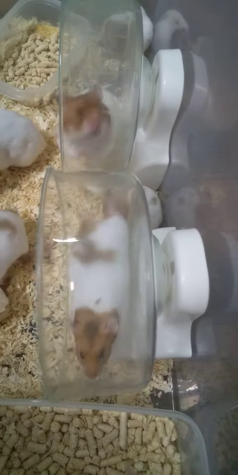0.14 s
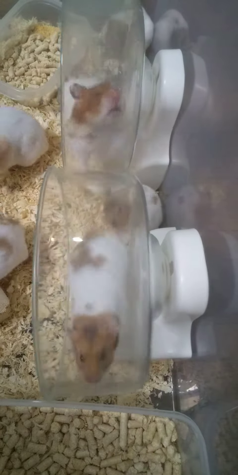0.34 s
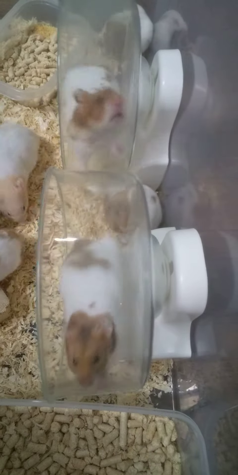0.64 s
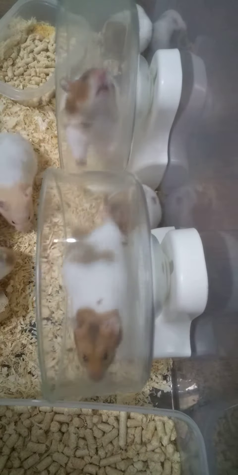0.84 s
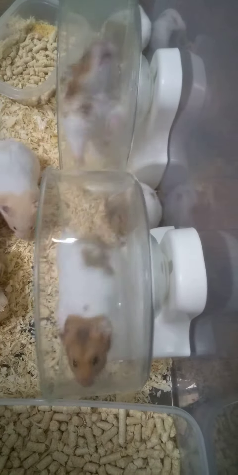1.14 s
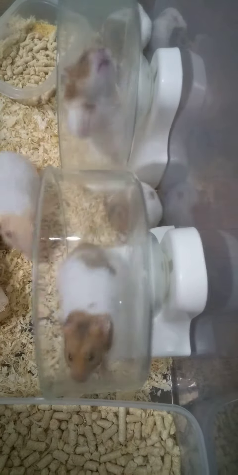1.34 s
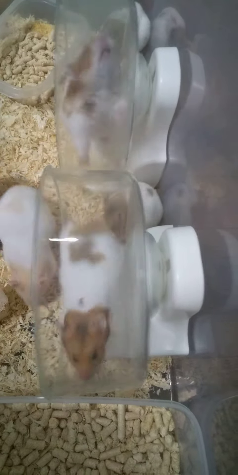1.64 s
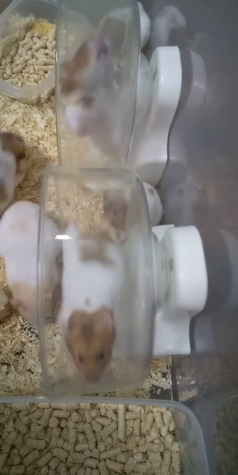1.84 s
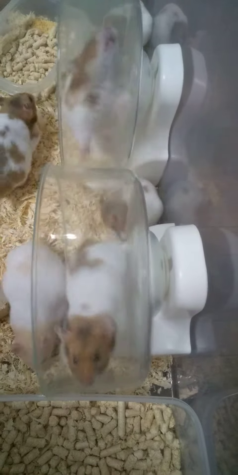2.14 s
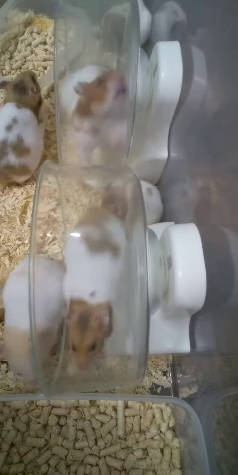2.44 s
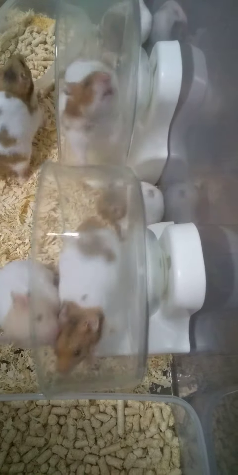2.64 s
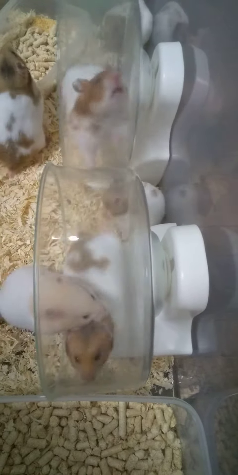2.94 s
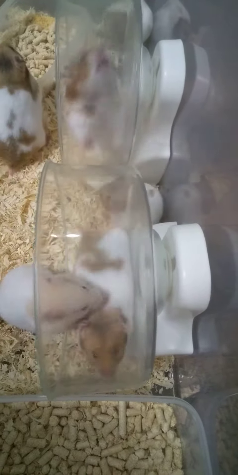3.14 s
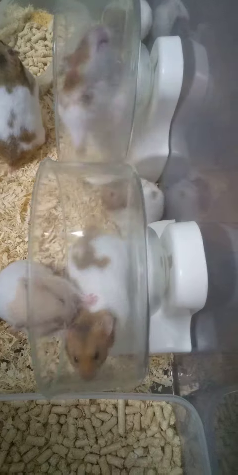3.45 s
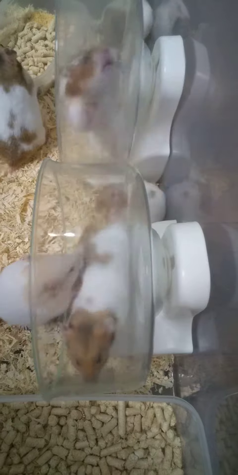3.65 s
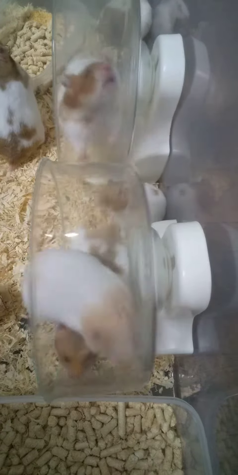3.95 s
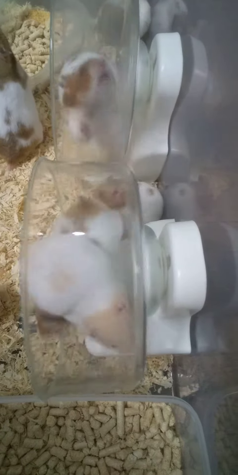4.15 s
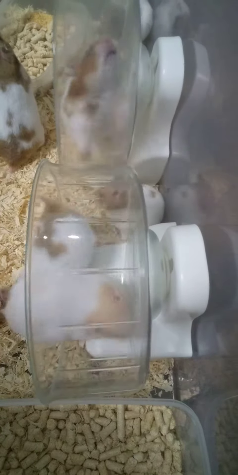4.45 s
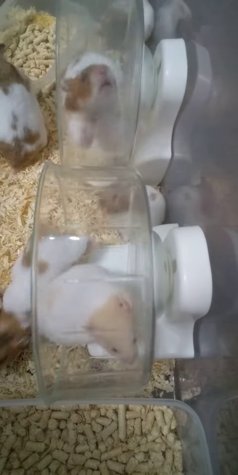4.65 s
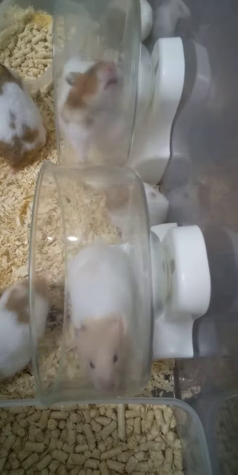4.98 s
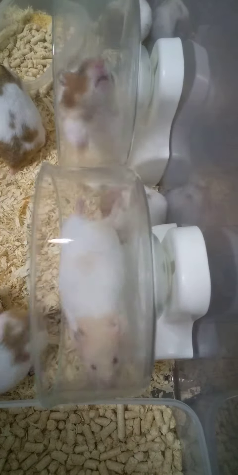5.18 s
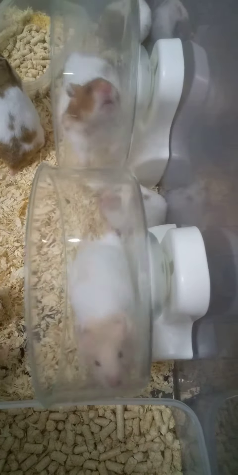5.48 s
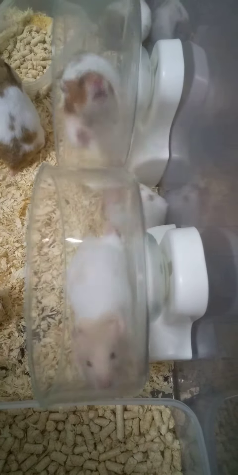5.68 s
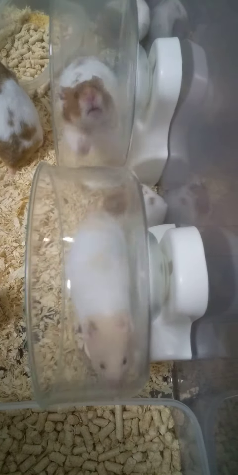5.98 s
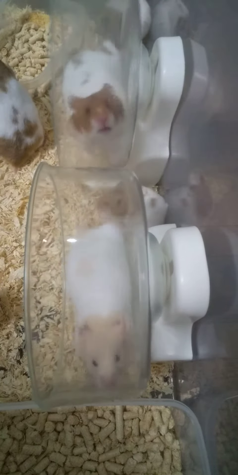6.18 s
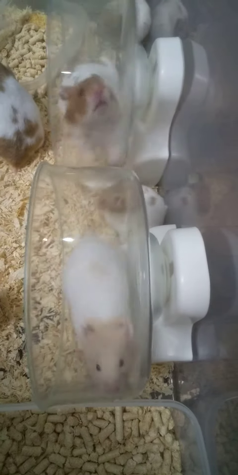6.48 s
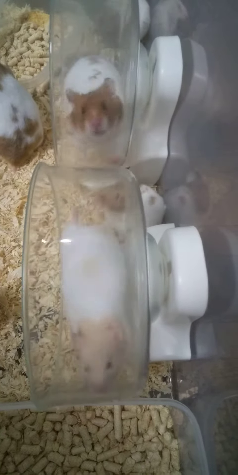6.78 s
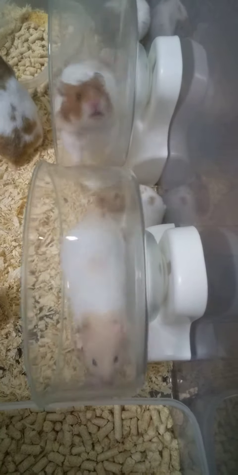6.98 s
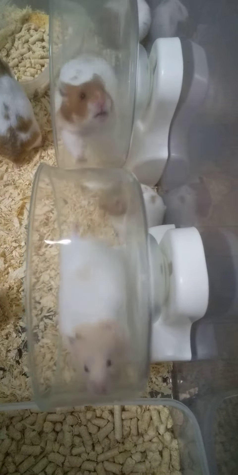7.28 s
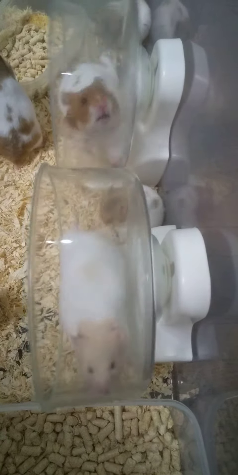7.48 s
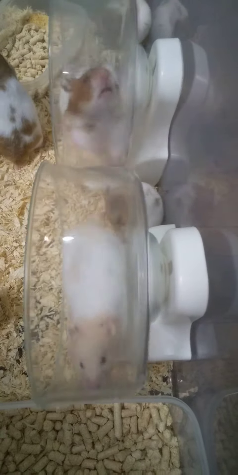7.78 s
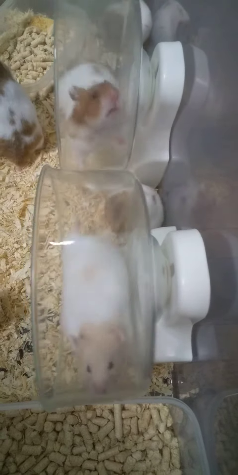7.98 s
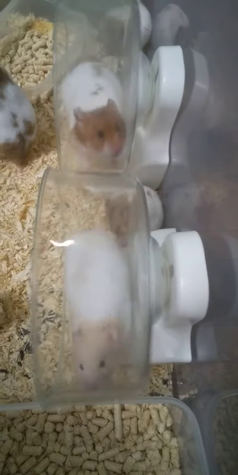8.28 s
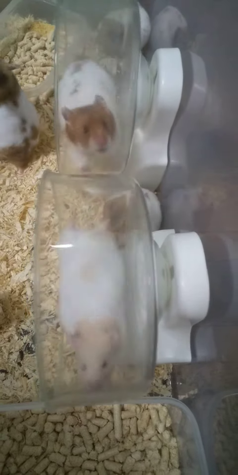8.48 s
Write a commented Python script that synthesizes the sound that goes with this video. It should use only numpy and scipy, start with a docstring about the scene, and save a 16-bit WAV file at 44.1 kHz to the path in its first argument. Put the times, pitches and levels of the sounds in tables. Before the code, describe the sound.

Small rodents run in plastic exercise wheels, their claws pattering over a low rumble while the loose stands knock irregularly.

```python
"""Small rodents run in plastic exercise wheels in a plastic tub, heard close and centred.
From the start the wheels rumble through the tub under a fine patter of claws and a faint hum.
The loose stands rock and knock on the tub floor throughout, while paws scuff and tick on the tracks.
From 3.5 s come a few hard taps on a rim, just after 4 s a cluster of dry snaps,
and around 7 s three short skids; the running carries on to the end."""
import sys
import numpy as np
from scipy import signal
from scipy.fft import rfft, irfft, next_fast_len
from scipy.io import wavfile

SR = 44100
rng = np.random.default_rng(int(sys.argv[2]) if len(sys.argv) > 2 else 0)


def persist_wave(psi):
    """Save psi, clipped to +-1, as 16-bit WAV."""
    counts = np.round(np.clip(psi, -1, 1) * 32767).astype(np.int16)
    wavfile.write(sys.argv[1], SR, np.atleast_2d(counts).T)


N = 380141

# fader moves of the running bed: (time [s], rumble [dB], drumming [dB], patter [dB])
BED_LEVELS = [(0.0, -40.5, -50, -57), (0.5, -43.5, -53, -58.5), (1.03, -40.5, -48.5, -56),
              (2.21, -37, -45.5, -56), (2.38, -43.5, -45, -55.5), (3.55, -41, -55.5, -59.5),
              (3.89, -41.5, -47, -56.5), (4.51, -41, -51, -54.5), (4.8, -51, -50.5, -59),
              (5.09, -39.5, -60, -58), (5.42, -38, -46, -54.5), (6.43, -39.5, -45.5, -53.5),
              (6.86, -41.5, -49, -54.5), (7.9, -40, -46, -56.5), (8.31, -38, -43, -54),
              (8.62, -42, -51, -55.5)]
# EQ of the wheel rumble: (frequency [Hz], level [dB])
RUMBLE_EQ = [(15, -34), (25, -2), (70, 0.5), (200, -15.5), (260, -25.5), (440, -120)]
# EQ of the drumming tub: (frequency [Hz], level [dB])
DRUMMING_EQ = [(71, 3), (120, 0.5), (374, -5), (450, -14), (547, -5.5), (630, -16), (791, -12), (1400, -26),
               (1600, -52), (2080, -52), (3520, -120)]
# EQ of bedding hiss and dry claw crackle: (frequency [Hz], level [dB])
PATTER_EQ = [(590, -46), (1000, 0), (1400, -3), (1990, -10), (2200, -7.5), (2490, -10.5), (3640, -10),
             (7500, -22), (8760, -19), (14300, -21)]
# spots of the track that claws ring: (frequency [Hz], level [dB], t60 [s])
TRACK_MODES = [(2236, -8, 0.054), (2830, -2, 0.029), (3206, -5, 0.025), (3690, -2.5, 0.038),
               (4250, -7.5, 0.048), (4730, -6.5, 0.029), (6610, -11, 0.032)]
# a stand hits the tub floor:
# (time [s], thud [dB], hollow ring over thud [dB], hard edge over thud [dB], roll from edge to flat [s])
STAND_KNOCKS = [(0.051, -38.5, -3, -14, 0.0036), (0.204, -48.5, 4, 0, 0.0016),
                (0.543, -27.5, -4.5, -29, 0.0021), (0.708, -20.5, -8.5, -32, 0.0037),
                (0.979, -14, -9, -21.5, .005), (1.17, -30.5, -26, -43, 0.0028),
                (1.25, -32, -14, -14.5, 0.00069), (1.363, -37.5, -12, -19, 0.0024),
                (1.433, -27.5, -6.5, -34, .004), (1.527, -20.5, -2.5, -25.5, 0.0035),
                (1.78, -17, -7, -21.5, 0.0019), (1.974, -30, -17, -26, 0.0018),
                (2.178, -32, -19, -19, .002), (2.248, -10, -3.5, -17, 0.0015),
                (2.493, -15, -5.5, -17.5, .005), (2.677, -24, -6, -27.5, 0.0039),
                (2.888, -37.5, -8, -14, 0.0012), (2.908, -26.5, -22, -20, 0.0022),
                (3.011, -15, 1, -16.5, 0.00098), (3.335, -19, -9, -27.5, 0.0019),
                (3.549, -28, -10.5, -30, 0.0025), (3.709, -38.5, -9, -16, 0.0015),
                (3.803, -10.5, -10.5, -29.5, 0.0019), (3.951, -34, -6, -13.5, .003),
                (4.058, -12, -6.5, -17.5, .005), (4.295, -31, -8.5, -23, 0.0011),
                (4.551, -11.5, -9.5, -14, .005), (4.753, -30.5, -13, -34, .001),
                (4.9, -26.5, -8, -36, .004), (5.036, -30.5, -2, -26, 0.0031),
                (5.177, -35.5, -3.5, -21, 0.00077), (5.29, -36, -10, -10, 0.00083),
                (5.313, -12.5, -11, -23, .005), (5.574, -10.5, 2.5, -11.5, 0.0021),
                (5.765, -25, -9, -32, 0.0019), (5.828, -33, -33, -15, .002),
                (5.977, -13.5, -6, -12, 0.00095), (6.13, -18, -9, -27, 0.0011),
                (6.261, -37.5, 2.5, -13, 0.0014), (6.419, -11, -2.5, -15.5, 0.0022),
                (6.55, -28.5, 3.5, -16.5, 0.0014), (6.6, -25.5, -18, -21, .004),
                (6.914, -36, -2, -27, 0.0017), (7.138, -24, -9, -43, 0.0016),
                (7.218, -27.5, -6.5, -42.5, 0.0025), (7.495, -28, -21, -28, 0.0016),
                (7.562, -12, -2, -16, 0.0021), (7.648, -30, -9, -23, 0.0014),
                (7.667, -24.5, -15.5, -34, 0.0022), (7.761, -29, -5.5, -38, 0.0025),
                (7.998, -12.5, -5, -16.5, 0.0059), (8.139, -17, 2, -13.5, .002),
                (8.469, -12, -3.5, -13.5, 0.0015)]
# modes of stand and tub: (frequency [Hz], level [dB], t60 [s])
STAND_MODES = [(91.2, -4, 0.11), (156, -19, 0.074), (179, -2.5, 0.068), (214.6, -4.5, 0.065),
               (265.5, 6.5, 0.034), (352, -11.5, 0.059), (497.8, -7, 0.14), (528.6, -21.5, 0.16),
               (666, -15, 0.084), (814.5, 5, 0.05), (810, -25.5, 0.46), (907, -11.5, 0.039),
               (933.7, -3.5, 0.047), (1107, -5, 0.012), (1247, -3, 0.048), (1296, 1.5, 0.1),
               (1418, 4.5, 0.026), (1765, -7, 0.055), (2276, 7.5, 0.014), (2321, -9.5, 0.13),
               (2470, -23, 0.047), (3190, -14, 0.026), (3154, 3, 0.025), (4000, -25, 0.036),
               (4100, -39, 0.044), (4286, -12, 0.02)]
# contacts within a knock, for each of its three layers: (delay [s], level [dB])
EDGE_CONTACTS = [(0, -5.5), (0.002, 3.5), (0.011, -9.5)]
THUD_CONTACTS = [(0.00324, -2), (0.014, -14)]
ROLL_S = np.array(STAND_KNOCKS)[:, 4]
HOLLOW_CONTACTS = [(-0.003, -20), (0, -10), (ROLL_S, 4), (ROLL_S + 0.00942, -6)]
# paws land on the track: (time [s], level [dB])
PAW_STEPS = [(0.0593, -47.5), (0.136, -47.5), (0.209, -54), (0.239, -47), (0.317, -45), (0.405, -44),
             (0.4845, -41), (0.5746, -44), (0.654, -47.5), (0.6744, -50), (0.7504, -41.5), (0.861, -45),
             (0.952, -45), (1.0316, -47.5), (1.1158, -47), (1.128, -46), (1.216, -44), (1.308, -45.5),
             (1.404, -45.5), (1.478, -48), (1.57, -49), (1.6724, -43), (1.7576, -45.5), (1.85, -48),
             (1.945, -48), (2.0403, -46), (2.132, -49), (2.2149, -47), (2.2812, -47), (2.3131, -48),
             (2.375, -48), (2.474, -42), (2.601, -49.5), (2.7038, -49), (2.759, -46), (2.8864, -49),
             (2.994, -51), (3.114, -46), (3.245, -47.5), (3.2915, -47), (3.324, -45), (3.489, -48.5),
             (3.591, -47), (3.928, -54), (4.339, -48), (4.4506, -41), (4.7423, -44.5), (5.4135, -43.5),
             (5.4804, -45), (5.5594, -53), (5.9239, -62), (5.954, -62), (6.0237, -46), (6.201, -46),
             (6.2662, -46), (6.3565, -45), (6.499, -47), (6.6084, -47), (6.7004, -42), (6.825, -46),
             (6.941, -49), (7.001, -41), (7.137, -43), (7.1733, -42.5), (7.2124, -48), (7.323, -46),
             (7.3754, -42), (7.453, -47), (7.642, -39.5), (7.7184, -46.5), (7.774, -48), (7.811, -43),
             (7.88, -40.5), (7.911, -46), (7.985, -36), (8.036, -39), (8.0571, -42), (8.07, -44),
             (8.236, -43.5), (8.2815, -50), (8.305, -49), (8.545, -36)]
# EQ of a paw's scuff: (frequency [Hz], level [dB])
SCUFF_EQ = [(900, -7), (1800, -2.5), (3000, -3.5), (4400, 2), (5400, -2), (7300, -10), (9000, -4.5),
            (11000, -13.5), (13300, -7), (14300, -10)]
# single claws that cut through: (time [s], level [dB], pitch [Hz])
CLAW_TICKS = [(0.325, -45, 2850), (0.5, -45, 2850), (0.6744, -54, 2850), (0.7497, -44, 2830),
              (1.128, -40, 3706), (1.23, -39, 2830), (1.414, -36.5, 2880), (1.587, -45, 2850),
              (1.735, -49, 4030), (1.948, -38.5, 2850), (2.0403, -43, 3500), (2.133, -42, 2850),
              (2.2149, -47, 3850), (2.688, -47, 2860), (2.704, -41, 5500), (4.4513, -42, 3500),
              (4.738, -46, 3170), (4.807, -49, 2820), (5.669, -47, 4830), (5.9239, -45.5, 3480),
              (6.201, -44, 3150), (6.2662, -45, 3700), (6.3565, -42, 4140), (6.6084, -43, 3650),
              (6.7014, -46, 3800), (6.941, -43, 3760), (7.017, -36.5, 2580), (7.117, -40, 3600),
              (7.2124, -39, 2790), (7.643, -37, 3580), (7.7426, -42.5, 2860), (7.8096, -42, 3540),
              (7.912, -42, 2880), (7.984, -43, 6600), (8.037, -36, 7060), (8.058, -39, 7000),
              (8.306, -38, 6960), (8.315, -33, 3500)]
# something hard taps a wheel rim: (time [s], level [dB], lows over level [dB], highs over level [dB])
RIM_TAPS = [(3.516, -52, 5, -22), (7.12, -39.5, 4, -13), (7.7191, -38, 2.5, -26),
            (7.8904, -26.5, -2.5, -35), (8.3197, -26, 3.5, -5.5), (8.4, -31, 6, -4)]
# modes of the rim: (frequency [Hz], level [dB], t60 [s])
RIM_MODES = [(252.5, 2, 0.029), (394, -40, .03), (517, 4.5, 0.019), (718, 3, 0.026), (1130, 10.5, 0.0057),
             (1334, 9, 0.015), (1580, -0.5, 0.0089), (2100, -20, 0.025), (2580, -22, 0.03),
             (2850, -25, 0.018), (3500, -45, 0.033), (3850, -1, 0.023), (4430, -28, .05),
             (6940, -51, 0.026), (9000, -57, 0.022)]
# contacts within a tap: (delay [s], level [dB])
TAP_CONTACTS = [(0, -5.5), (0.0021, 7.5), (0.005, -8), (0.009, -10)]
# snaps in the bedding or on the plastic: (time [s], level [dB], t60 [s])
DRY_SNAPS = [(4.2347, -41, 0.048), (4.297, -43, 0.012), (4.419, -12.5, 0.027), (4.456, -30, 0.024)]
# EQ of a snap: (frequency [Hz], level [dB])
SNAP_EQ = [(180, -21), (300, 1), (1540, -4.5), (1780, 0.5), (3180, -13), (3620, 2.5), (5090, -53),
           (9000, -56), (11700, -73), (19800, -120)]
# paws skid along the track: (time [s], length [s], level [dB])
PAW_SKIDS = [(6.986, 0.089, -49), (7.065, 0.1, -52), (7.247, .06, -53.5)]
# EQ of a skid: (frequency [Hz], level [dB])
SKID_EQ = [(590, -32), (1000, -1), (1950, -4.5), (2820, 1), (3080, -6), (3720, -5), (4490, -11.5),
           (14300, -19)]


def amp(db):
    """Gain of a level in dB."""
    return 10 ** (np.asarray(db) / 20)


def rms_one(x):
    """Normalise to rms 1."""
    return x / np.sqrt(np.mean(x ** 2) + 1e-20)


def noise():
    """White noise, the length of the scene."""
    return rng.standard_normal(N)


def band(x, side, hz, order=2):
    """High-pass or low-pass filter."""
    return signal.sosfilt(signal.butter(order, hz, side, fs=SR, output="sos"), x)


def coloured(x, eq):
    """Shape x with an EQ curve and normalise to rms 1."""
    size = next_fast_len(N)
    hz, level_db = np.transpose(eq)
    bins_hz = np.maximum(np.arange(size // 2 + 1) * SR / size, 1)
    gain = amp(np.interp(np.log(bins_hz), np.log(hz), level_db))
    return rms_one(irfft(rfft(x, size) * gain, size)[:N])


def drift(rate_hz):
    """Smooth random modulator of rms 1."""
    r = np.exp(-2 * np.pi * rate_hz / SR)
    return rms_one(signal.lfilter([1], [1, -2 * r, r * r], rng.standard_normal(N + SR))[SR:])


def ring(drive, hz, t60):
    """Resonator: a unit click starts a decaying sine of height 1."""
    r, w = amp(-60 / (t60 * SR)), 2 * np.pi * hz / SR
    return signal.lfilter([0, np.sin(w)], [1, -2 * r * np.cos(w), r * r], drive + 1e-18)


def tub_shake(level_db, eq, lumps_db, rate_hz):
    """Axles and paws shake the tub: a lumpy low end."""
    return amp(level_db + lumps_db * drift(rate_hz)) * coloured(noise(), eq)


def hum():
    """A faint, steady, breathy tone."""
    return amp(-62) * rms_one(ring(noise(), hz=557, t60=0.064))


def claw_hits(per_s, spread_db):
    """Random claw impulses, and the spot of the track each one lands on."""
    hits = rng.random(N) < per_s / SR
    strength = amp(spread_db * np.minimum(rng.exponential(1, N), 4))
    return hits * strength * rng.choice([-1, 1], N), rng.integers(0, len(TRACK_MODES), N)


def track_ring(hits, spots):
    """Each claw rings the spot of plastic it lands on."""
    return sum(amp(db) * ring(hits * (spots == k), hz, t60)
               for k, (hz, db, t60) in enumerate(TRACK_MODES))


def patter(level_db):
    """Clumps of tiny claw contacts, some ringing and some dry, over the hiss of shifting bedding."""
    grains = track_ring(*claw_hits(per_s=190 * amp(4.5 * drift(22)), spread_db=4.5))
    dry_hits, _ = claw_hits(per_s=110 * amp(4.1 * drift(8.3)), spread_db=7)
    crackle = signal.lfilter([1], [1, -0.97], np.abs(dry_hits)) * noise()   # millisecond puffs
    low, high = band(noise(), "low", 7000), band(noise(), "high", 7000)
    hiss = low * amp(2.3 * drift(36)) + high * amp(1.3 * drift(16))
    hiss *= amp(2.2 * drift(45))   # the bands flicker both apart and together
    rustle = coloured(hiss + amp(-12) * rms_one(crackle), PATTER_EQ)
    return amp(level_db) * (rustle + amp(-7) * rms_one(grains))


def struck(times, levels_db, modes, contacts, spread_db, contact_s, neighbour=-1):
    """Each blow rings the modes through a few soft contacts, a little different every time."""
    out = np.zeros(N)
    scatter_db = spread_db * rng.standard_normal((len(times), len(modes), len(contacts)))
    t = np.arange(int(contact_s * SR) + 3) / SR
    push = np.hanning(len(t))   # the force swells and fades during a contact
    for k, (hz, mode_db, t60) in enumerate(modes):
        clicks = np.zeros(N)
        for j, (delay, contact_db) in enumerate(contacts):
            at = np.minimum(((times + delay) * SR).astype(int), N - 1)
            np.add.at(clicks, at, amp(levels_db(hz) + mode_db + contact_db + scatter_db[:, k, j]))
        force = push / push.sum() * np.cos(2 * np.pi * hz * (t - t.mean()))
        # a negative neighbour swings adjacent modes against each other
        out += neighbour ** k * ring(np.convolve(clicks, force)[:N], hz, t60)
    return out


def stand_knocks(hollow_from_hz=650, edge_from_hz=1000):
    """The foot lands in stages: a graze, the edge, full weight as it rolls flat, a small rebound."""
    times, thud_db, hollow_db, edge_db, _ = np.transpose(STAND_KNOCKS)
    highs = [mode for mode in STAND_MODES if mode[0] >= edge_from_hz]
    mids = [mode for mode in STAND_MODES if hollow_from_hz <= mode[0] < edge_from_hz]
    lows = [mode for mode in STAND_MODES if mode[0] < hollow_from_hz]
    edge = struck(times, lambda hz: thud_db + edge_db, highs, EDGE_CONTACTS,
                  spread_db=5, contact_s=0.00173)
    hollow = struck(times, lambda hz: thud_db + hollow_db, mids, HOLLOW_CONTACTS,
                    spread_db=3, contact_s=0.0018)
    # the floor gives way as one, a moment later, and pushes the air up first
    thud = struck(times, lambda hz: thud_db, lows, THUD_CONTACTS,
                  spread_db=4, contact_s=0.0022, neighbour=0.99)
    return edge + hollow + band(thud, "high", 110)


def in_tub(x, wet_db=-18, t60=0.24, damping_hz=1630):
    """The tub walls add a dense, dull, hollow tail."""
    t = np.arange(SR // 2) / SR
    tail = rng.standard_normal(len(t)) * amp(-60 * t / t60) * np.minimum(t / 0.00217, 1)
    tail = signal.lfilter(*signal.butter(1, damping_hz, fs=SR), tail)
    return x + amp(wet_db) * signal.fftconvolve(x, tail / np.linalg.norm(tail))[:N]


def footfalls(scuff_t60=0.045, tick_t60_cycles=118, jolt_hz=3174):
    """Steps and jolts scuff up a gritty hiss and drag claws over the track; single claws tick out."""
    ticks, envelope, t = np.zeros(N + SR), np.zeros(N + SR), np.arange(SR // 8) / SR
    # every knock and tap jolts the grit on the track: a scuff and a click
    jolts = [(s, db + edge_db - 11) for s, db, _, edge_db, _ in STAND_KNOCKS]
    jolts += [(s, db + high_db + 5) for s, db, _, high_db in RIM_TAPS]
    for s, db in PAW_STEPS + jolts:
        envelope[round(s * SR):][:len(t)] += amp(db - 60 * t / scuff_t60) * np.minimum(t / 0.0028, 1)
    for s, db, hz in CLAW_TICKS + [(s, db - 6.5, jolt_hz) for s, db in jolts]:
        shape = amp(db - 60 * t * hz / tick_t60_cycles) * np.minimum(t / 0.0004, 1)
        ticks[round(s * SR):][:len(t)] += shape * np.sin(2 * np.pi * hz * t)
    envelope = envelope[:N]
    hiss = coloured(noise(), SCUFF_EQ)
    air = band(hiss, "high", 9000) * 0.6 * np.tanh(drift(9.4))   # some steps are brighter than others
    grit = (hiss + air) * amp(0.98 * drift(400))
    hits, spots = claw_hits(per_s=600, spread_db=2.5)
    return ticks[:N] + amp(-2) * envelope * grit + amp(-0.5) * track_ring(envelope * hits, spots)


def rim_taps(mid_from_hz=1000, high_from_hz=2600):
    """A sharp contact rings the rim, with a short chatter after it."""
    times, db, low_db, high_db = np.transpose(RIM_TAPS)

    def levels_db(hz):
        return db + (low_db if hz < mid_from_hz else 0 if hz < high_from_hz else high_db)

    return struck(times, levels_db, RIM_MODES, TAP_CONTACTS, spread_db=2.5, contact_s=0.00136)


def snaps():
    """Bedding or plastic cracks: unpitched, instant attack, very short decay."""
    envelope, t = np.zeros(N), np.arange(SR // 8) / SR
    for s, db, t60 in DRY_SNAPS:
        envelope[round(s * SR):][:len(t)] += amp(db - 3.5 - 60 * t / t60)
    return envelope * coloured(noise(), SNAP_EQ)


def skids():
    """Paws slide on the track: a rough scrape that swells and fades."""
    envelope = np.zeros(N)
    for s, length, db in PAW_SKIDS:
        swell = signal.windows.tukey(round(length * SR), 0.6)
        envelope[round(s * SR):][:len(swell)] += amp(db) * swell
    return envelope * amp(2.9 * drift(120)) * coloured(noise(), SKID_EQ)


def scene():
    """Everything sits in the centre; only the treble flickers between left and right."""
    times, *faders = np.transpose(BED_LEVELS)
    rumble_db, drumming_db, patter_db = (np.interp(np.arange(N) / SR, times, db) for db in faders)
    rumble = tub_shake(rumble_db, RUMBLE_EQ, lumps_db=1.64, rate_hz=3.8)
    drumming = tub_shake(drumming_db, DRUMMING_EQ, lumps_db=6, rate_hz=39)
    bed = rumble + drumming + hum()
    impacts = in_tub(stand_knocks() + rim_taps() + snaps())
    mid = bed + impacts + footfalls() + skids() + patter(patter_db)
    side = amp(-7) * band(mid * drift(137), "high", 6800, order=8)
    return np.array([mid + side, mid - side])


def record(dry, low_cut_hz=36, high_cut_hz=14330):
    """The close microphone pair loses the deepest bass; the top is cut steeply."""
    thin = band(dry, "high", low_cut_hz, order=5)
    return signal.sosfilt(signal.ellip(12, 0.5, 80, high_cut_hz, fs=SR, output="sos"), thin)


dry = scene()
out = record(dry)
persist_wave(out)
```